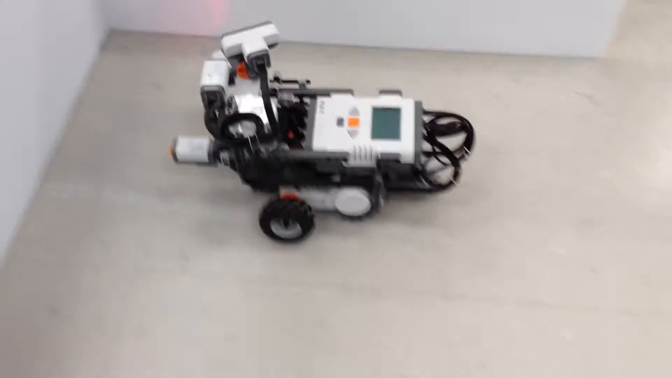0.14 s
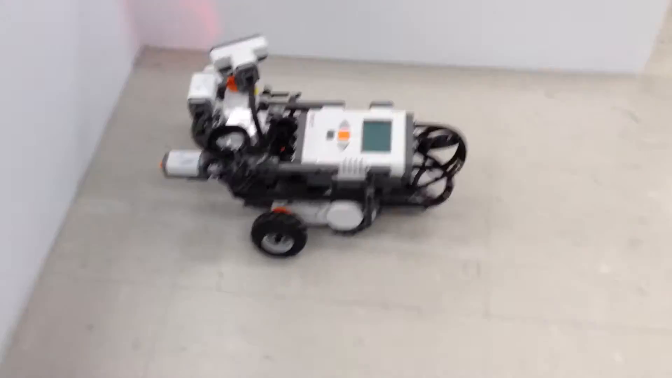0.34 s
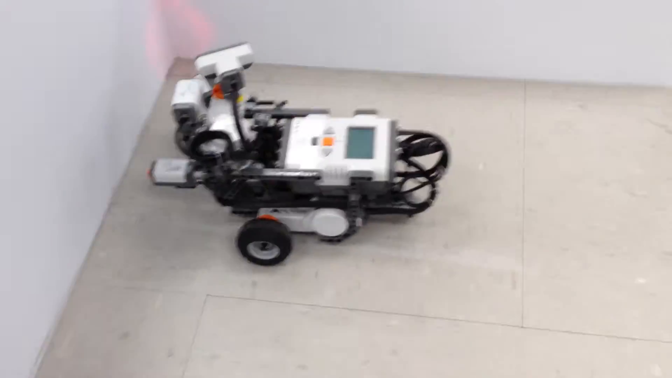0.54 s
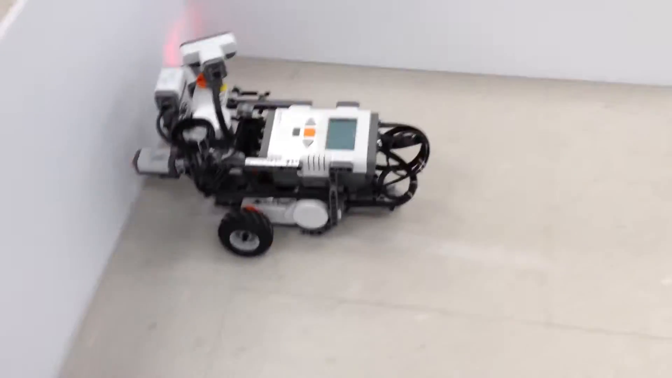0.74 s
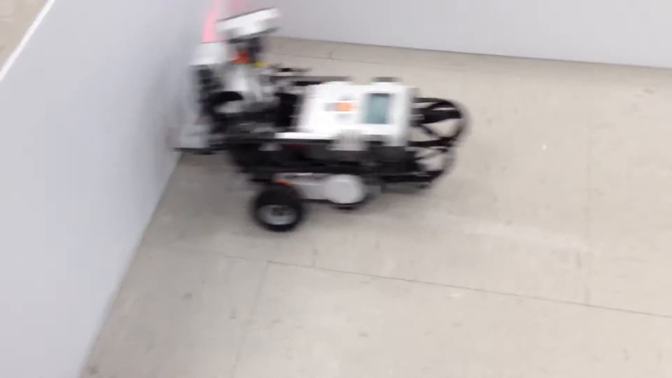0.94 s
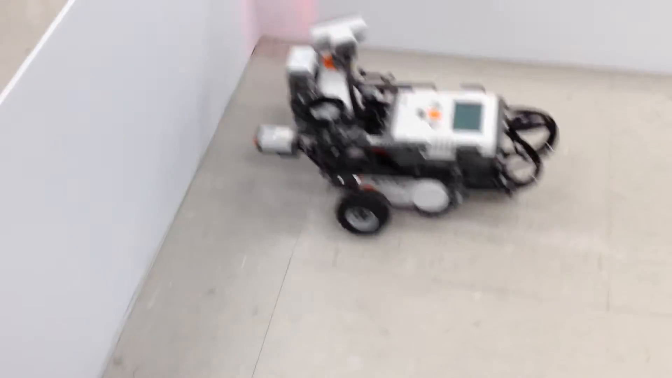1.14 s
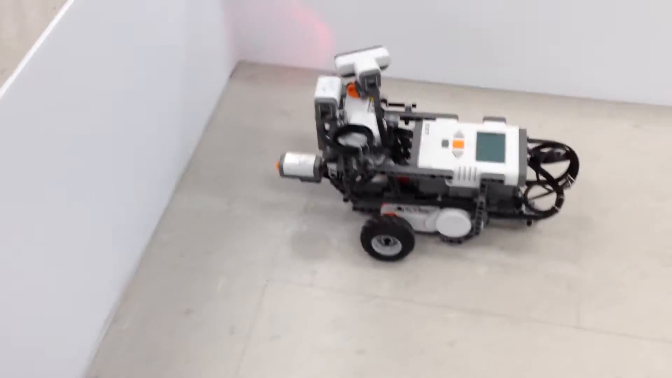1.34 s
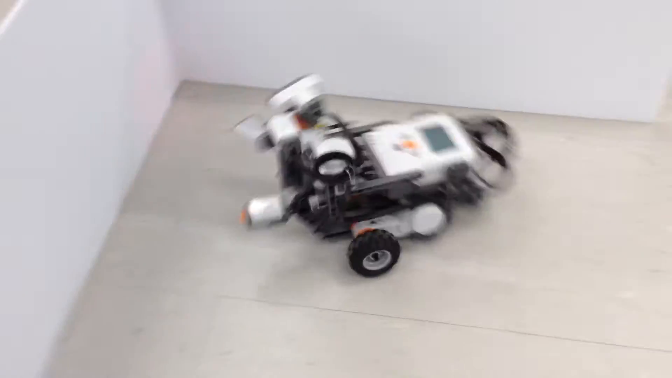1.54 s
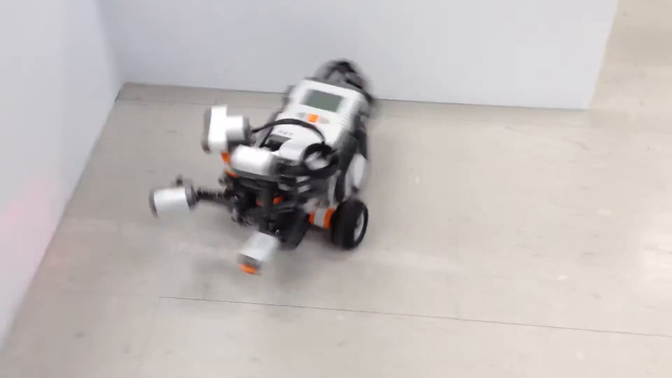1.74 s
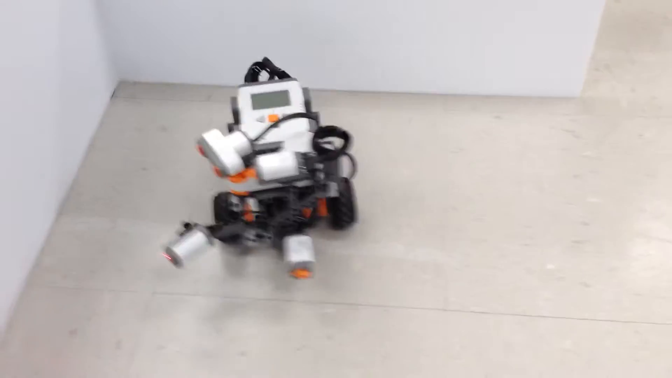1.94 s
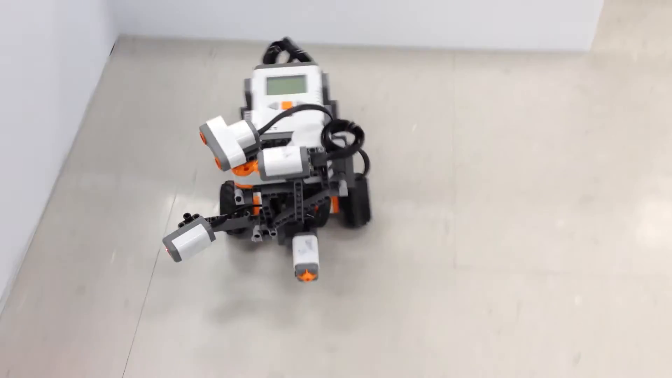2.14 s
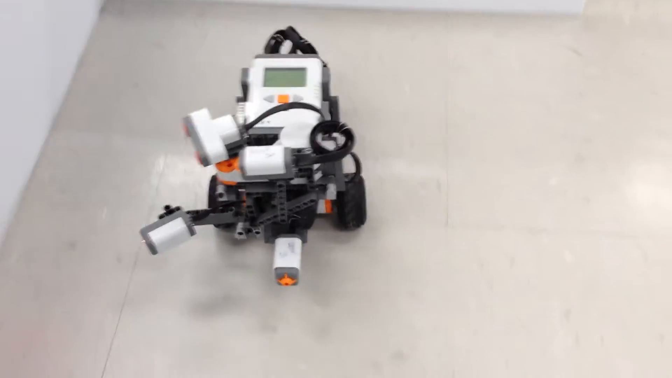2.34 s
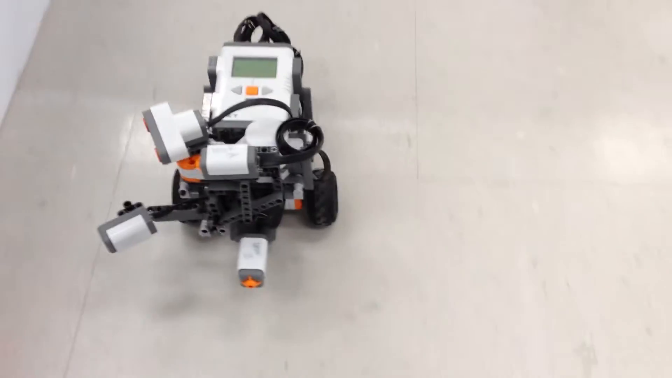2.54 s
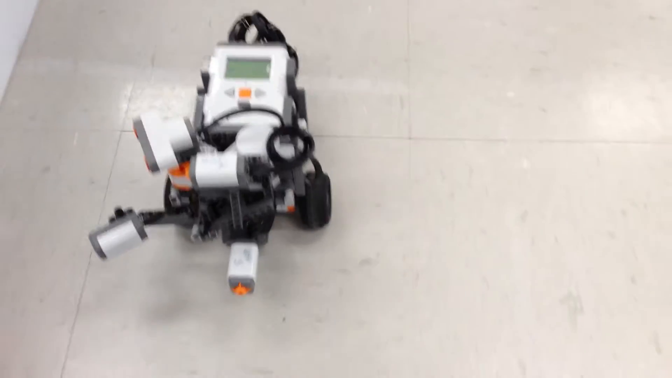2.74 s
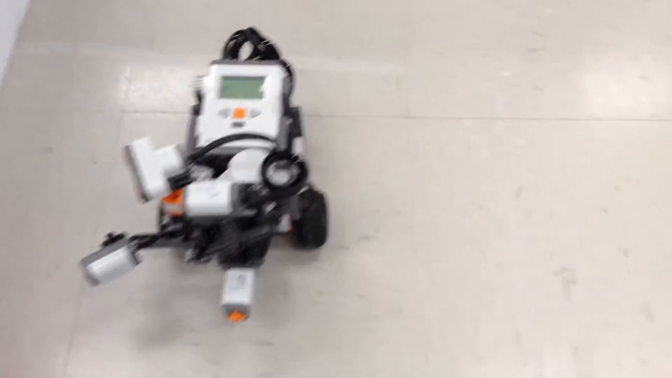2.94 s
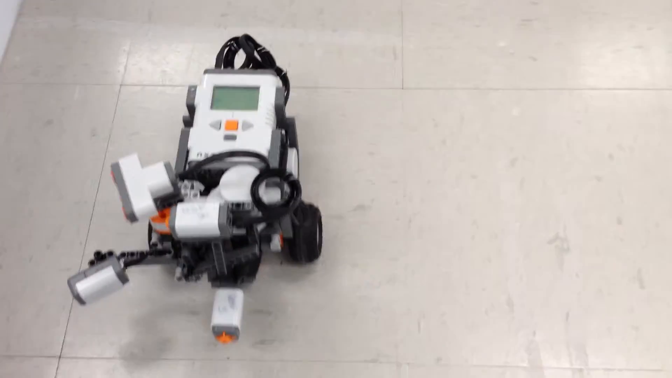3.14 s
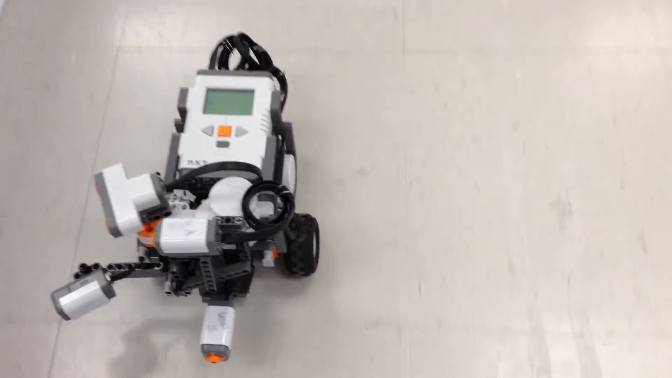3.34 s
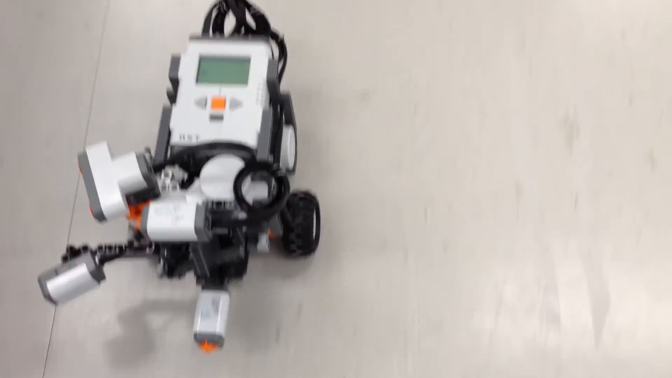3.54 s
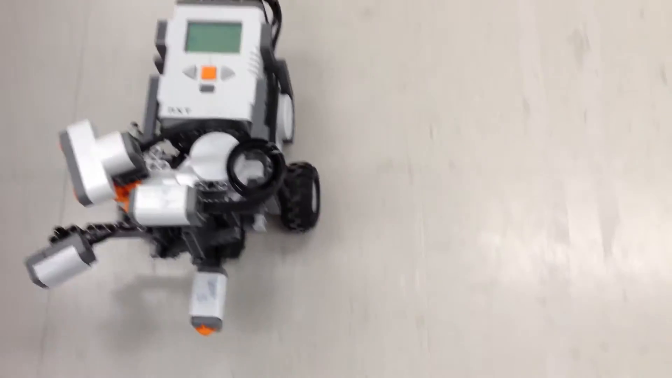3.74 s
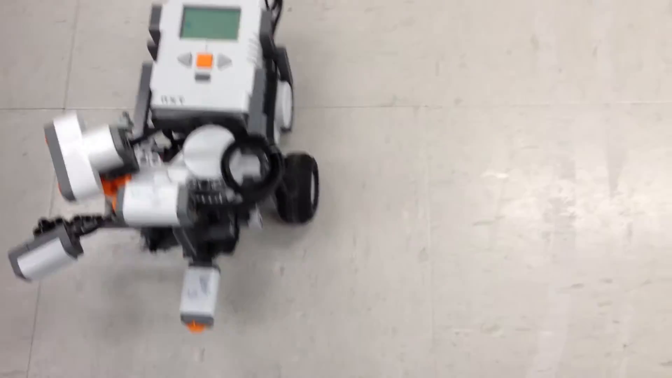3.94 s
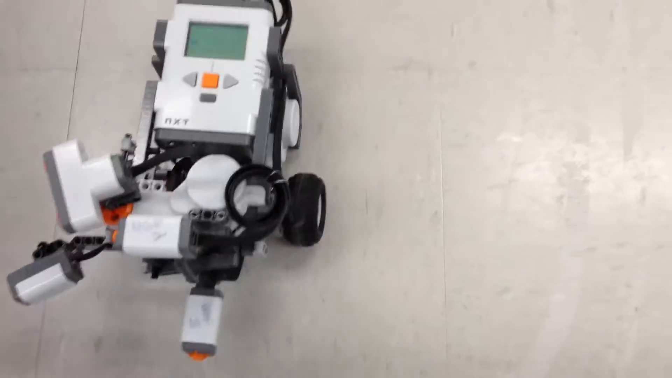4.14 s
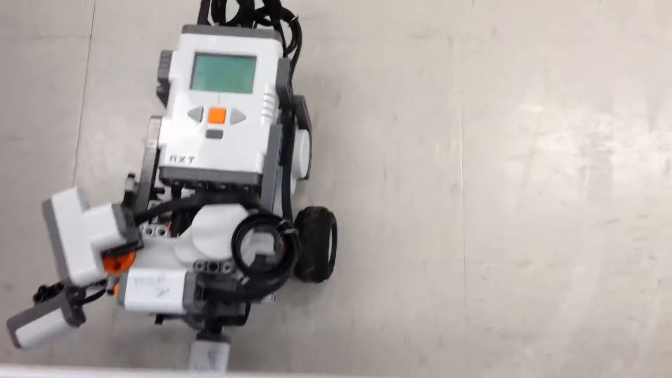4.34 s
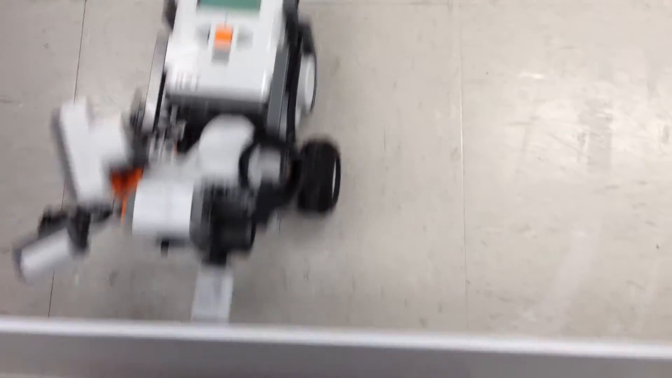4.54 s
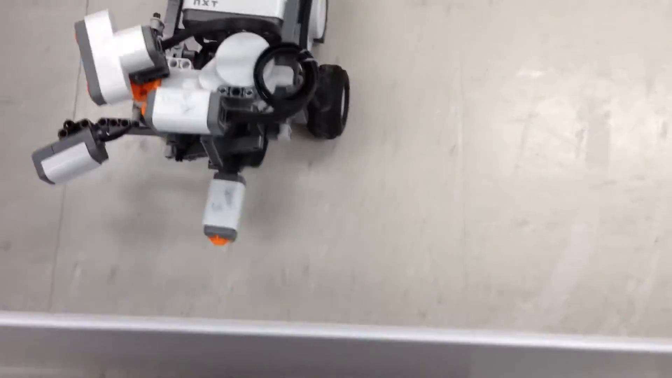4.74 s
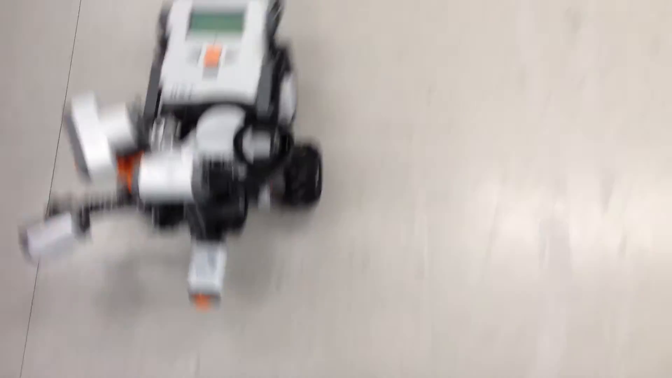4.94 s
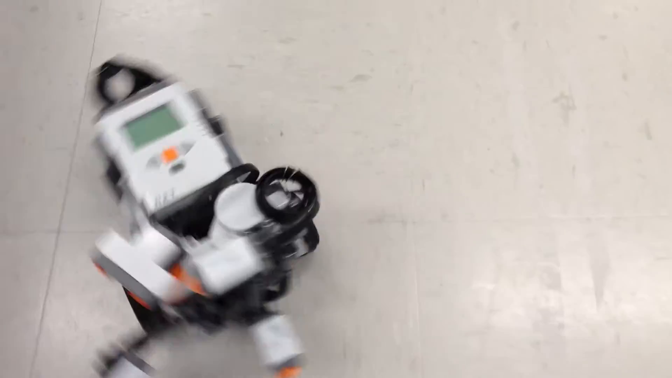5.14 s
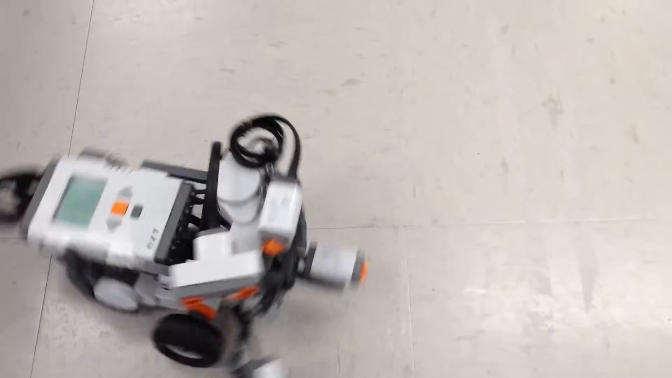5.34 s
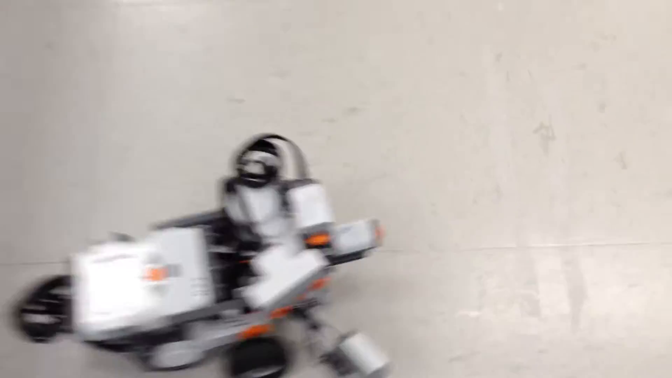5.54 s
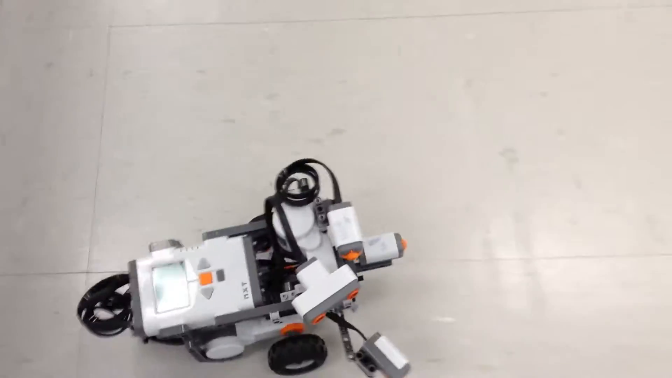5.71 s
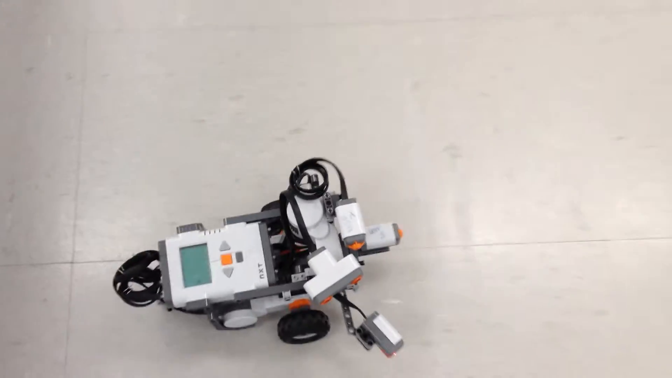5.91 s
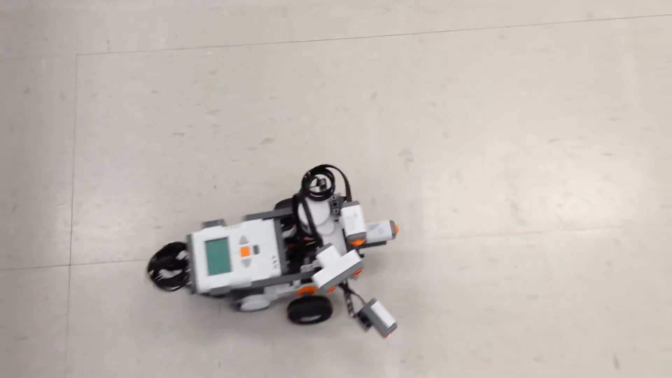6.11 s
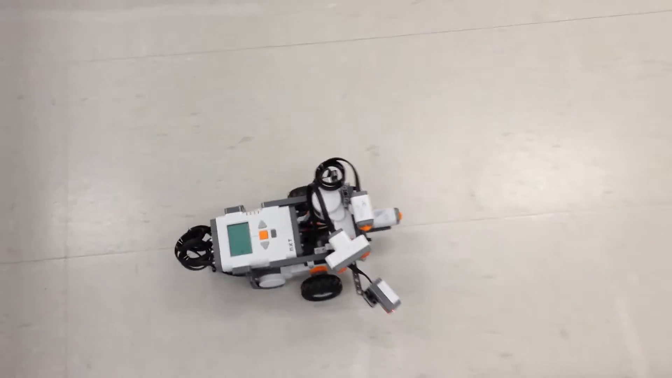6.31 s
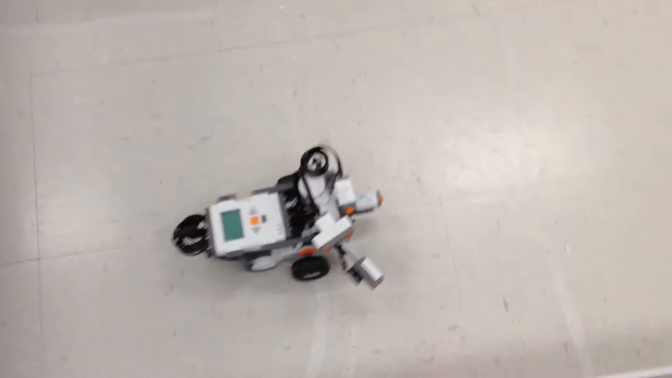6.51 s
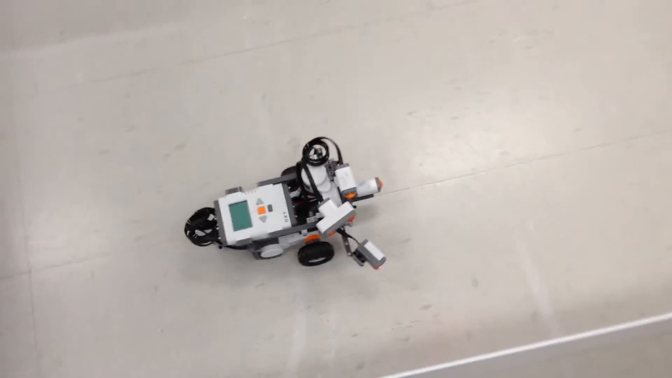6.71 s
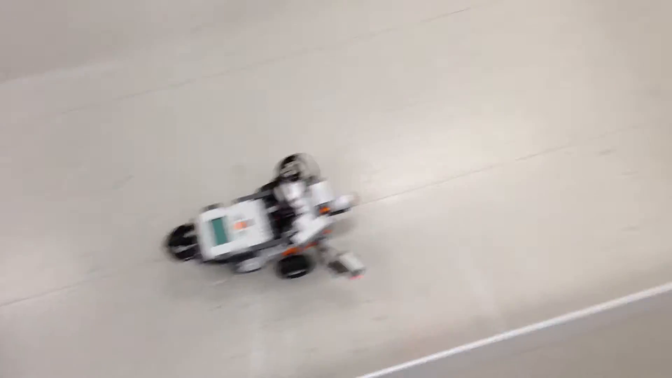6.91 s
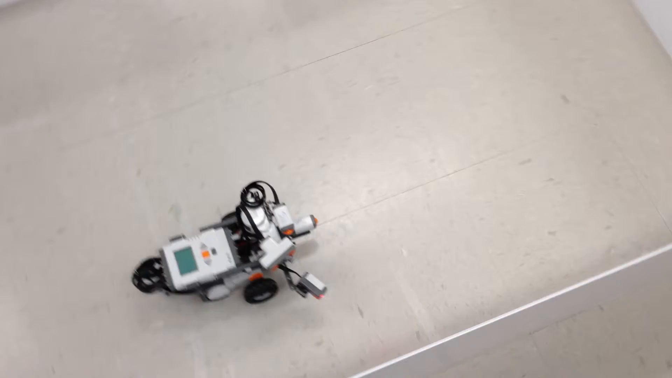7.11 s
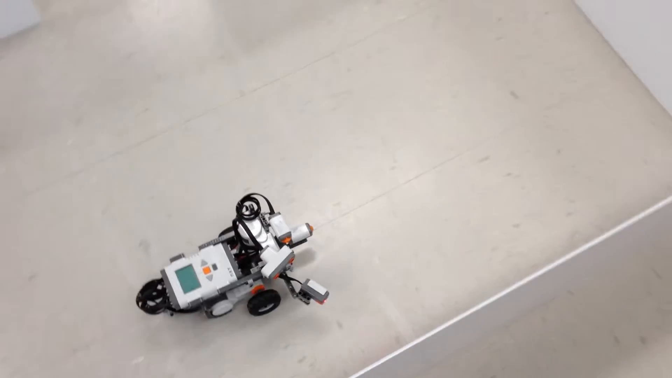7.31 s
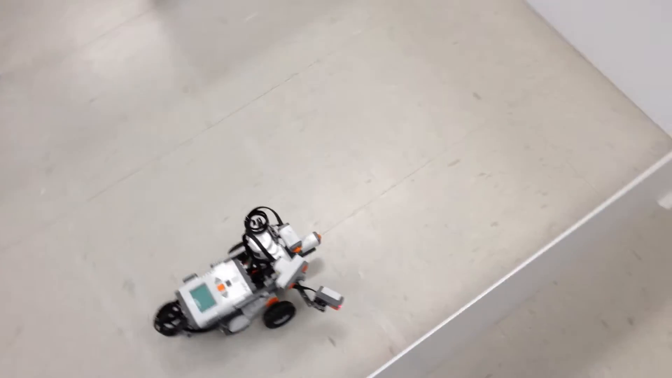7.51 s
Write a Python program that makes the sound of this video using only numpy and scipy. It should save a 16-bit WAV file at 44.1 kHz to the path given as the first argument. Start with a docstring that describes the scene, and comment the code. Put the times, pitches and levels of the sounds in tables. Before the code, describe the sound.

Close, steady whine of two small geared motors with gritty plastic rattle. Just before one second dull knocks hit a hollow panel, the motors choke, then race higher backwards with a rougher rasp, dip and turn. Steady driving follows until a second, softer bump near 4.4 seconds, another stall, retreat and turn, then rolling away. Small hard room, faint ventilation, handheld microphone nearby.

```python
"""Whining, rattling toy robot on a hard floor: two bumps into a wall panel, each with a stall and a retreat,
then it rolls on and away over ventilation noise.
Two geared motors: overtones of the tooth rate plus gritty bursts per tooth, coloured by a plastic housing.
Knocks are a push, a crack and a ringing panel; wheels and air are filtered noise; the room adds echoes."""
import sys
import numpy as np
from scipy import signal
from scipy.fft import rfft, irfft, next_fast_len
from scipy.io import wavfile
from scipy.ndimage import map_coordinates

SR = 44100
rng = np.random.default_rng(int(sys.argv[2]) if len(sys.argv) > 2 else 0)


def bounce(signal):
    """Save signal as a 16-bit WAV file at the path given by the first command-line argument."""
    frames = np.transpose(np.atleast_2d(signal))
    limited = np.clip(frames, -1, 1)
    pcm = np.round(limited * 32767).astype(np.int16)
    wavfile.write(sys.argv[1], SR, pcm)


N = 333837
TIME = np.arange(N) / SR

# moves, where both motors slow, spin up past cruising speed and sag back: [start/s,
# slowest outer tooth rate/Hz, slowest inner/Hz, spin-up/s, top outer/Hz, top inner/Hz, sag/s,
# dip before the move/dB, swell/dB, strain/dB, judder/share of speed]
MOVES = [(0.893, 394.3, 396, 0.18, 937, 905, 0.16, -1, 3.5, -4.5, 0.013),
         (1.413, 540, 540, 0.155, 882, 695, 0.245, 4.5, 2.5, 4.5, 0.005),
         (1.94, 598, 597.3, 0.064, 790, 629, 0.051, 1.5, 0, -3, 0.013),
         (2.025, 663.4, 631, 0.12, 950.5, 671.6, 0.14, -2.5, 1, -1, 0.016),
         (2.24, 799.4, 609, 0.047, 773.5, 635, 0.099, 1.5, 0, -1.5, 0.017),
         (3.881, 622, 618, 0.097, 678.3, 697, 0.11, 0.5, -1.5, 3, .016),
         (4.025, 612.4, 612.2, 0.21, 700.5, 676, 0.15, -2.5, 0.5, 2, 0.015),
         (4.447, 387.4, 387, 0.16, 847, 821, 0.18, -0.5, 3.5, -8.5, 0.015),
         (4.985, 582.5, 584, 0.09, 805.7, 662.6, 0.315, 2.5, 2, 7, 0.00404),
         (5.482, 660, 639, 0.11, 829, 679, 0.21, 2, 0.5, 3, 0.02),
         (5.86, 642, 572, 0.042, 719, 611.4, 0.093, 0.5, -0.5, 0.5, 0.0095),
         (5.95, 645, 573, 0.041, 708, 615.5, 0.1, 0, -1, 1, 0.0095),
         (6.02, 644.7, 572, 0.12, 742.5, 634.8, 0.13, -0.5, -1, 1.5, 0.00998)]
# bumps into the wall: [t/s, time until driving forwards again/s, stall level change/dB, extra strain/dB]
BUMPS = [(.842, 0.51, -17.5, 12), (4.401, 0.564, -15.5, 15)]
STALL_S = 0.028  # from bump to stall


def amp(db):
    """Decibels to gain."""
    return 10 ** (np.asarray(db) / 20)


def unit(x):
    """Scales to rms 1."""
    return x / np.sqrt(np.mean(x ** 2) + 1e-20)


def curve(rows):
    """Table columns interpolated linearly over TIME."""
    s, *columns = np.transpose(rows)
    return np.squeeze([np.interp(TIME, s, c) for c in columns])


def colour(x, points):
    """Filters by a spectrum of [f/Hz, gain/dB] points, joined on a log-frequency axis."""
    hz, db = np.transpose(points)
    size = next_fast_len(N)
    f = np.fft.rfftfreq(size, 1 / SR)
    gain = amp(np.interp(np.log(f + 1), np.log(hz), db))
    return irfft(rfft(x, size) * gain, size)[:N]


def band(x, lo_hz, hi_hz, order=2):
    """Butterworth band-pass."""
    sos = signal.butter(order, [lo_hz, min(hi_hz, .49 * SR)], "band", fs=SR, output="sos")
    return signal.sosfilt(sos, x)


def wander(rate):
    """Smooth random signal of rms 1 through `rate` random knots a second."""
    knots = signal.resample(rng.standard_normal(1024), 8192)
    return unit(np.interp(TIME * rate % 1024, np.arange(8192) / 8, knots))


def resonate(x, hz, pole_width_hz):
    """Two-pole resonance of unit peak gain with a movable centre: shift to 0 Hz, low-pass, shift back."""
    turn = np.exp(2j * np.pi * np.cumsum(hz * np.ones(len(x))) / SR)
    r = np.exp(-np.pi * pole_width_hz / SR)
    baseband = signal.lfilter([(1 - r) ** 2], [1, -2 * r, r * r], x / turn)
    return 2 * (turn * baseband).real


def ventilation(air_db=-57.5):
    """Air noise as shaped noise, plus hum tones of slightly wandering pitch."""
    # air spectrum: [f/Hz, relative level/dB]
    air_colour = [(18, -70), (30, -53), (70, -23), (102, -7.5), (233, 0.5), (296, -8), (450, -16.5),
                  (540, -9), (590, -24.5), (659, -12), (918, -16), (1100, -18), (1430, 2), (2420, -120)]
    # hum tones: [f/Hz, rms level/dB]
    hum_tones = [(155, -69.5), (238, -67.5)]
    air = amp(air_db) * unit(colour(rng.standard_normal(N), air_colour))
    hum = 0
    for hz, db in hum_tones:
        cycles = np.cumsum(hz + 1.97 * wander(12)) / SR
        hum = hum + amp(db) * np.sqrt(2) * np.sin(2 * np.pi * cycles)
    return air + hum


def wheel_roll():
    """Wheels on the floor: band-passed noise with a lumpy level."""
    # rolling rumble: [t/s, level/dB]
    roll_level = [(5.9, -70), (6.15, -60), (6.6, -63), (7.57, -72)]
    rumble = band(rng.standard_normal(N), 170, 570, order=3)
    return amp(curve(roll_level)) * unit(rumble * amp(1.9 * wander(30)))


def squeaks(pole_width_hz=227):
    """Rubbing plastic: narrow-band noise under a short Gaussian envelope."""
    # squeaks of the running gear: [t/s, width at 1/e/s, f/Hz, level/dB]
    squeak_rows = [(4.914, 0.055, 6520, -34), (6.003, 0.081, 2340, -44)]
    out = np.zeros(N)
    for s, length_s, hz, db in squeak_rows:
        envelope = np.exp(-(2 * (TIME - s) / length_s) ** 2)
        out += amp(db) * envelope * unit(resonate(rng.standard_normal(N), hz, pole_width_hz))
    return out


def knocks(ring_db=-5, crack_t60_s=0.049, push_s=0.0013, push_db=-8):
    """Each blow is a short push, a dull crack of plastic and the decaying modes of the panel."""
    # knocks of the frame on wall and floor: [t/s, blow gain/dB, crack level in the blow/dB]
    blows = [(0.817, -33.5, 3), (0.83, -25.5, -21), (0.832, -36, 1), (0.843, -27, -1), (0.867, -29, -8),
             (0.948, -39, -1), (0.961, -32, -11), (4.374, -38, 8.5), (4.397, -30.5, -0.5), (4.406, -32, -6),
             (4.435, -37, -4), (4.506, -35, -6), (4.522, -35, -12), (6.126, -39.5, -14)]
    # panel modes: [nominal f/Hz, relative level/dB, t60/s]
    panel = [(158.5, -4, 0.43), (198, 10.5, 0.15), (287, 4, 0.17), (332.6, -2.5, 0.37), (418, -18, 0.11),
             (626, -13, 0.54)]
    out, t = np.zeros(N + SR), np.arange(SR // 3) / SR
    for s, db, crack_db in blows:
        ring = np.zeros(len(t))
        for hz, level_db, t60_s in panel:
            mode_hz = hz * rng.uniform(0.93, 1.03)
            ring += amp(level_db - 60 * t / t60_s) * np.sin(2 * np.pi * mode_hz * t)
        crack = band(rng.standard_normal(len(t)), 140, 850, order=3) * amp(-60 * t / crack_t60_s)
        push = band((1 - t / push_s) * np.exp(-t / push_s), 190, 1200)
        parts = [(ring_db, ring), (crack_db, crack), (push_db, push)]
        blow = sum(amp(part_db) * part / abs(part).max() for part_db, part in parts)
        out[round(s * SR):][:len(t)] += amp(db) * blow
    return band(out[:N], 153, 1050)


def surge(start_s, spin_up_s, sag_s, sag_shape=1.9):
    """Shape of a move, both 0-1: how far it has spun up, how much overshoot is left."""
    risen = 1 - (1 - np.clip((TIME - start_s) / spin_up_s, 0, 1)) ** 2
    sagging_s = np.maximum(TIME - start_s - spin_up_s, 0)
    return risen, np.exp(-(sagging_s / sag_s) ** sag_shape)


def speeds(brake_s=.04, judder_s=.2, judder_per_s=70):
    """Tooth rates (Hz) of outer and inner motor: each move takes over from the last, with a judder."""
    # cruising tooth rate of the motor outside in the turns: [t/s, f/Hz]
    outer_cruise = [(0, 663.7), (.8, 682), (1.36, 617), (1.9, 608), (2.36, 714.6), (2.82, 676), (3.01, 631),
                    (3.11, 677), (3.5, 679.7), (3.65, 652.5), (3.8, 683), (4.88, 656), (5.42, 633.4),
                    (5.84, 702.7), (6.42, 652), (6.82, 712.5), (7.11, 653), (7.2, 693.5), (7.57, 688.6)]
    # cruising tooth rate of the other motor: [t/s, f/Hz]
    inner_cruise = [(0, 663), (.29, 648), (.55, 672), (1.4, 605), (1.77, 685.3), (2.47, 654), (2.6, 633),
                    (3, 641.4), (3.12, 660.3), (3.39, 629), (3.62, 648.8), (4.91, 648.5), (5.82, 639.7),
                    (6.3, 674.4), (6.41, 610), (6.6, 644), (6.84, 610.7), (7.15, 645.7), (7.57, 631)]
    cruise = hz = np.array([curve(outer_cruise), curve(inner_cruise)])
    judder = 0
    for start_s, outer_low_hz, inner_low_hz, spin_up_s, outer_hz, inner_hz, sag_s, *_, shudder in MOVES:
        slowest_hz = np.array([[outer_low_hz], [inner_low_hz]])
        top_hz = np.array([[outer_hz], [inner_hz]])
        risen, left = surge(start_s, spin_up_s, sag_s)
        goal_hz = cruise + (top_hz - cruise) * left
        takeover = np.clip(1 + (TIME - start_s) / brake_s, 0, 1)
        hz = hz + takeover * (slowest_hz + risen * (goal_hz - slowest_hz) - hz)
        judder = np.maximum(judder, shudder * takeover * np.exp(-((TIME - start_s) / judder_s) ** 2))
    return hz * (1 + judder * np.array([wander(judder_per_s), wander(judder_per_s)]))


def effort():
    """Level and strain (dB) of the gears: slack and swell per move, stall and kick per bump."""
    # cruising level, nearing and leaving: [t/s, level/dB]
    cruise_level = [(0, -34.5), (.3, -33), (.85, -31), (1.75, -33), (2.2, -30.5), (2.9, -31.5), (4.3, -29),
                    (5.3, -30), (6, -29), (6.45, -32), (7.57, -35)]
    lull_lead_s, lull_s = 0.041, 0.039  # gears go slack just before a move
    rest_strain_db, grip_s = -.7, 0.033
    strain_hold, strain_shape = 1.15, 3.7  # sag time factor; steepness of the release
    recover_s, kick_s = 0.068, .06
    level_db, strain_db = curve(cruise_level), rest_strain_db
    for start_s, _, _, spin_up_s, _, _, sag_s, lull_db, swell_db, load_db, _ in MOVES:
        risen, left = surge(start_s, spin_up_s, sag_s)
        lull = np.exp(-((TIME - start_s + lull_lead_s) / lull_s) ** 2)
        level_db = level_db + swell_db * risen * left - lull_db * lull
        elapsed_s = np.maximum(TIME - start_s, 0)
        gripped = np.minimum(elapsed_s / grip_s, 1)
        held = np.exp(-(elapsed_s / (spin_up_s + sag_s * strain_hold)) ** strain_shape)
        strain_db = strain_db + load_db * gripped * held
    for s, _, drop_db, kick_db in BUMPS:
        since_stall_s = TIME - s - STALL_S
        level_db = level_db + drop_db * np.interp(since_stall_s, [-STALL_S, 0, recover_s], [0, 1, 0])
        # the motors tear away
        strain_db = strain_db + kick_db * np.interp(since_stall_s, [0, kick_s, 2 * kick_s], [0, 1, 0])
    return level_db, strain_db


def backwards(back_share=0.93, slack_share=0.11, flank_s=0.029):
    """Share (0-1) of the rear tooth flanks: high from each stall until driving forwards again."""
    backing = 0
    for s, length_s, *_ in BUMPS:
        begun_s = TIME - s - STALL_S
        remaining_s = s + length_s - TIME + flank_s / 2
        backing = backing + np.clip(np.minimum(begun_s, remaining_s) / flank_s, 0, 1)
    return np.clip(slack_share + (back_share - slack_share) * backing, 0, 1)


def backlash(per_s=2500):
    """Loose gears and pegs chatter: sparse random ticks of uneven size."""
    return unit((rng.random(N) < per_s / SR) * rng.standard_normal(N))


def gearbox(speed_hz, overtones_db, flutter_rate=110, bite=0.47, count=10, size=480):
    """One motor: whine at multiples of the tooth rate, and a gritty burst as each tooth lands."""
    uneven = .21  # spread of the pinion's teeth
    worn = .85  # scraping repeated each pinion turn, against chance scraping
    flutter = .0028 * wander(flutter_rate) + .004 * wander(26) + .005 * wander(11)
    teeth = np.cumsum(speed_hz * (1 + flutter)) / SR
    tooth, whine = teeth % count, np.zeros(N)
    for multiple, db in enumerate(overtones_db, 1):
        # unequal teeth put sidebands at the shaft rate round each overtone
        pinion = unit(rng.standard_normal(count))
        runout = np.interp(tooth, np.arange(count + 1), np.append(pinion, pinion[0]) - pinion.mean())
        sway_db = 2.5 * wander(30) + 1.2 * wander(5)
        tone = np.cos(2 * np.pi * (multiple * teeth + rng.random()))
        whine += amp(db + sway_db) * (1 + uneven * runout) * tone
    # read by pinion angle, so the grain glides with the speed
    angle = teeth / count * size
    surface = map_coordinates(rng.standard_normal(size), [angle], order=3, mode="grid-wrap")
    landing = bite + np.exp(-(teeth % 1) / 0.81)
    grit = landing * (rng.standard_normal(N) + worn * surface)
    # slack in the gear train: uneven contact
    contact_db = 1.5 * wander(30) + 1.3 * wander(100)
    return whine * amp(contact_db), unit(grit * amp(.3 * contact_db))


def strained_whine(outer, inner, turning, strain_db, back, relief_db=-8, drag_db=9, back_db=-5):
    """Outer motor takes the strain and brightens; inner one goes quiet unless a tight turn drags on it."""
    # extra whine under strain: [f/Hz, gain/dB]
    strain_colour = [(1400, -4), (1600, 6), (2150, -3), (2500, 6), (3100, 2), (3750, 5), (4350, 7),
                     (4750, 4), (5250, 10), (5650, -5)]
    strain = amp(strain_db)
    extra = np.maximum(strain - 1, 0) * colour(outer, strain_colour)
    inner_gain_db = np.clip(strain_db / 4, 0, 1) * (relief_db + drag_db * turning) + back_db * back
    return outer * np.minimum(strain, 1) + extra + inner * amp(inner_gain_db)


def case_ring(x, pole_width_hz=460):
    """Gearbox case: a resonance that shifts and changes strength as the frame flexes under load."""
    # case resonance: [t/s, f/Hz, gain/dB]
    case = [(0, 4180, -10), (1.6, 4100, -2), (1.67, 4100, 9), (1.77, 4000, 11), (1.93, 4220, 2),
            (1.975, 4260, 11), (2.04, 4420, -11), (2.15, 4560, -18), (2.62, 3830, 0), (3.9, 4020, -18),
            (4.9, 4564, -3), (5.03, 4525, 2), (5.22, 4400, -5), (5.35, 4234, 10), (5.5, 4393, -3),
            (7.57, 4484, -8)]
    case_hz, case_db = curve(case)
    return amp(case_db) * resonate(x, case_hz, pole_width_hz)


def flank_rattle(grit, back):
    """Tooth rattle, crossfaded between the rasps of the two tooth flanks."""
    # front-flank rattle: [f/Hz, relative level/dB]
    forward = [(600, -32), (1050, -23.5), (1350, -8.5), (2200, -5.5), (3300, -6.5), (4000, 2), (4700, 5),
               (5200, -3), (7300, 3.5), (8500, -3), (10500, -8), (12000, -6.5), (15200, -16)]
    # rear-flank rattle: [f/Hz, relative level/dB]
    backward = [(600, -25.5), (1050, -15), (1500, -12), (2400, -3), (2750, -1), (3150, 7.5), (4100, 4),
                (4500, 4), (5400, -5), (6400, 6), (7400, 3.5), (8400, -7.5), (12000, -7.5), (15200, -26)]
    return (1 - back) * unit(colour(grit, forward)) + back * unit(colour(grit, backward))


def reversing_whine(whine, back, skip_db=3, skip_per_s=28):
    """Backwards the teeth keep losing touch: recoloured, broken whine; it fades as they float at top speed."""
    # whine change on the rear flanks: [f/Hz, gain/dB]
    back_whine = [(850, 7), (1250, -5), (1480, 3), (1850, 4), (2050, -4), (2600, -7), (3200, 2.5),
                  (6000, -18)]
    float_after_s, float_s, float_db = 0.242, 0.028, -10  # delay after the bump, duration, depth
    floating = sum(np.exp(-((TIME - s - float_after_s) / float_s) ** 2) for s, *_ in BUMPS)
    broken = amp(skip_db * wander(skip_per_s)) * colour(whine, back_whine)
    return ((1 - back) * whine + back * broken) * amp(float_db * floating)


def robot(chatter=0.42, case_rasp=0.53, rattle_db=-3, side_rattle_db=-1.5):
    """Both gearboxes through case and housing, coloured by which way the robot faces."""
    # overtones of the tooth rate, first upwards: [outer motor level/dB, inner motor level/dB]
    mesh = [(-24, -24), (-14, -18), (-15.5, -15), (-20, -15.5), (-18.5, -21), (-20, -14.5), (-18, -15),
            (-22.5, -23), (-31.5, -37)]
    # radiation of the whine by the housing: [f/Hz, gain/dB]
    housing = [(500, -19), (850, -16), (1130, -14.5), (1340, -2.5), (1950, -1.5), (2250, -3), (2500, -2),
               (3200, 1), (3550, -5), (3820, 1.5), (4200, -1), (4600, 3.5), (5020, -1.5), (5300, 1.5),
               (5750, -5.5), (6500, 1), (7100, 18.5), (10000, -2)]
    # whine with the robot's back turned: [f/Hz, gain/dB]
    away_colour = [(1380, 2.5), (1950, 0), (4000, 1)]
    # robot seen side-on: [f/Hz, gain/dB]
    side_colour = [(1300, -1), (3400, 2), (4600, 0), (5600, 6.5), (7000, 2)]
    # gain on a slightly brighter share of the whole robot sound, 0 dB = no change: [t/s, gain/dB]
    share_gain = [(0, 7.5), (3.6, 2), (5.6, -2), (6.4, -40), (7.57, -4)]
    outer_db, inner_db = np.transpose(mesh)
    outer_hz, inner_hz = speeds()
    level_db, strain_db = effort()
    back = backwards()
    outer, outer_grit = gearbox(outer_hz, outer_db)
    inner, inner_grit = gearbox(inner_hz, inner_db)
    turning = np.clip((outer_hz - inner_hz - 60) / 80, 0, 1)
    whine = strained_whine(outer, inner, turning, strain_db, back)
    grit = unit(unit(outer_grit + inner_grit) + chatter * backlash())
    whine += case_ring(whine + case_rasp * grit)
    rattle = flank_rattle(grit, back)
    whine = reversing_whine(whine, back)
    away = np.interp(TIME, [5.42, 6.32], [0, 1])  # turns its back
    whine = (1 - away) * whine + away * colour(whine, away_colour)
    side_on = np.interp(TIME, [1.5, 1.98], [1, 0])  # turns to face the microphone
    # side-on the frame screens some rattle
    rattle_gain = amp(rattle_db + side_rattle_db * side_on)
    sound = amp(level_db) * (rattle_gain * rattle + colour(whine, housing))
    sound = (1 - side_on) * sound + side_on * colour(sound, side_colour)
    # all frequencies, 5 dB more on top
    bright_share = colour(sound, [(5000, -11.5), (9000, -6.5)])
    return sound + (amp(curve(share_gain)) - 1) * bright_share


def room(x, t60_s=0.49, wet_db=-13, near_db=-13, count=6):
    """A few near reflections from floor and walls, and a short diffuse tail."""
    t = np.arange(SR // 2) / SR
    tail = rng.standard_normal(len(t)) * amp(-60 * t / t60_s) * (t > .008)
    echo = amp(wet_db) * tail / np.linalg.norm(tail)
    near = rng.integers(SR // 400, SR // 60, count)
    echo[near] += amp(near_db) * rng.choice([-1, 1], count) / np.sqrt(count)
    echo[0] = 1  # direct sound
    return signal.fftconvolve(x, echo / np.linalg.norm(echo))[:N]


def scene():
    """Robot in the room over the background, the same in both channels."""
    sound = room(robot() + squeaks() + knocks()) + ventilation() + wheel_roll()
    return np.array([sound, sound])


def record(dry, edge_hz=15400):
    """Band limit of the recorder: linear-phase low-pass."""
    lowpass = signal.firwin(511, edge_hz, window=("kaiser", 9), fs=SR)
    return signal.oaconvolve(dry, lowpass[None], "same")


dry = scene()
out = record(dry)
bounce(out)
```